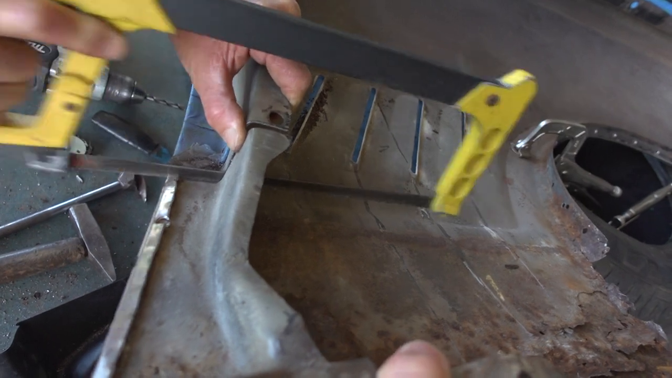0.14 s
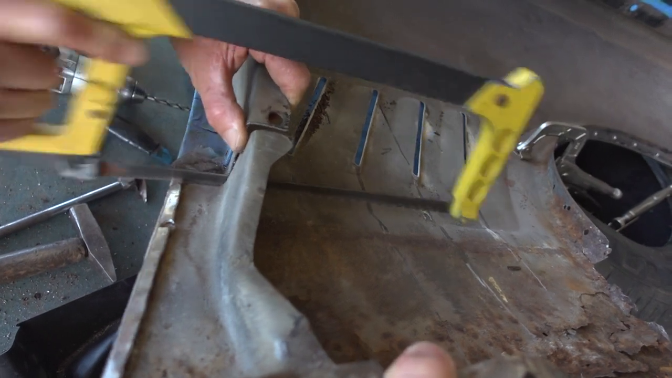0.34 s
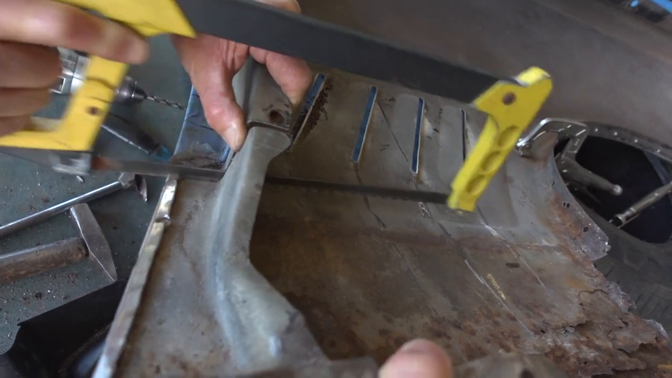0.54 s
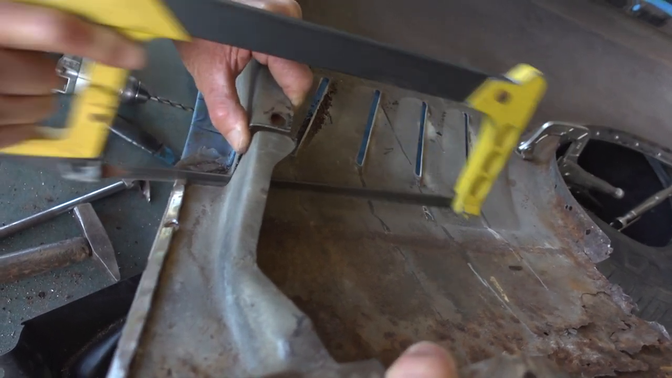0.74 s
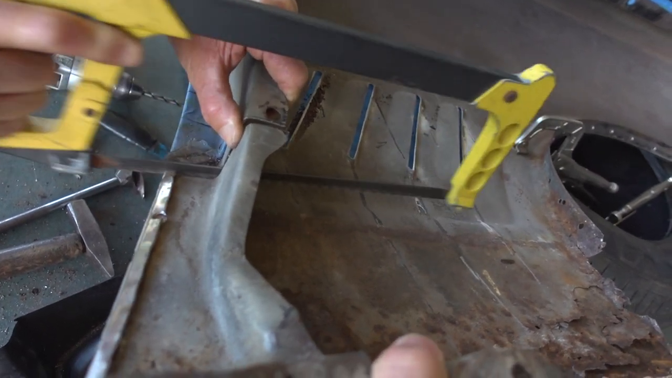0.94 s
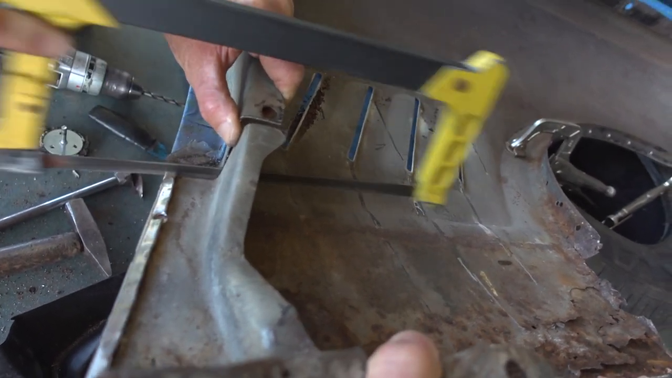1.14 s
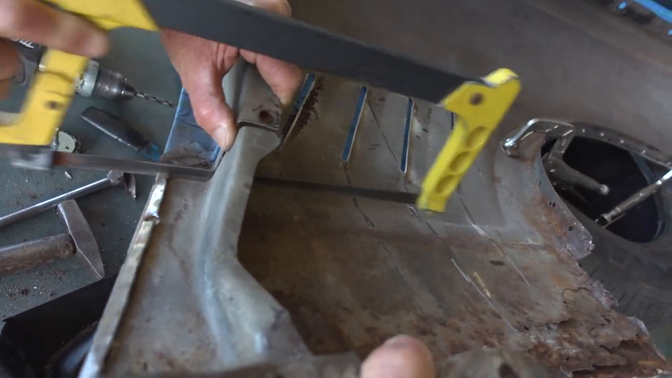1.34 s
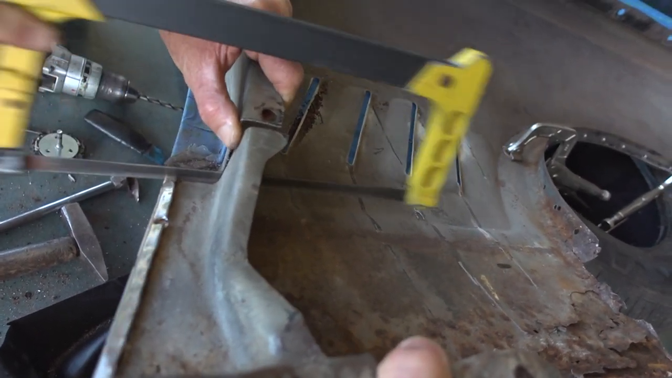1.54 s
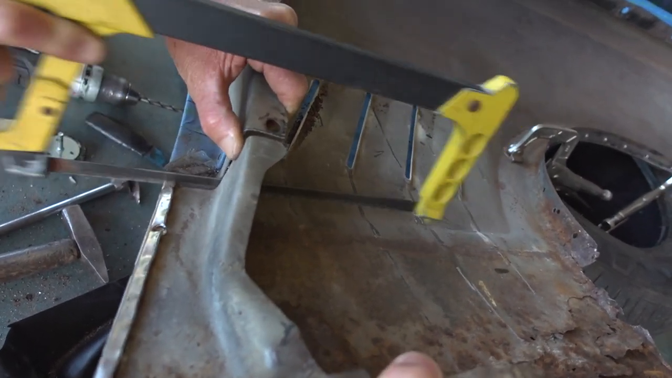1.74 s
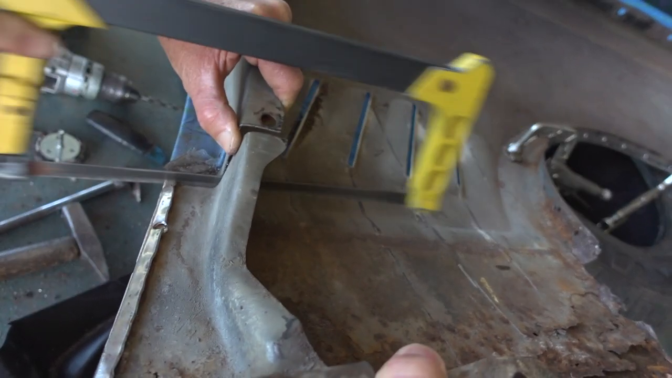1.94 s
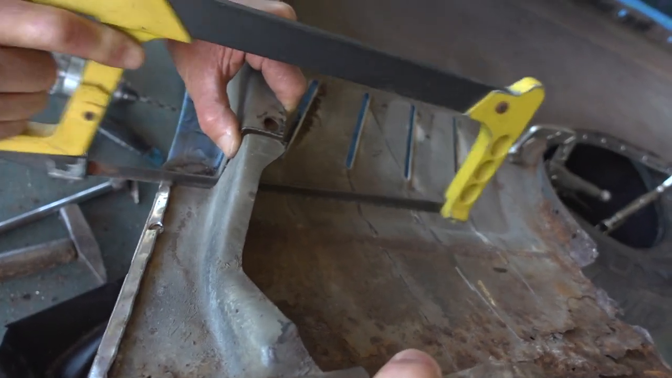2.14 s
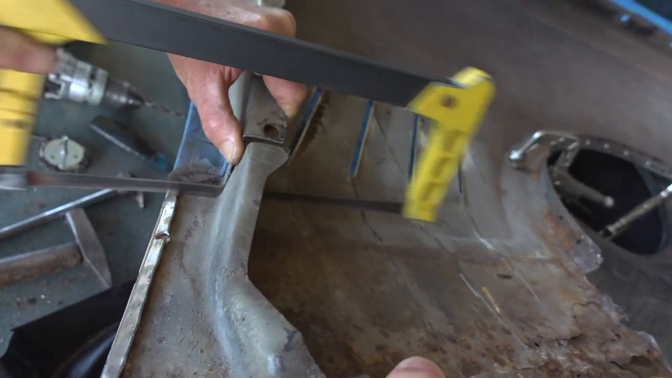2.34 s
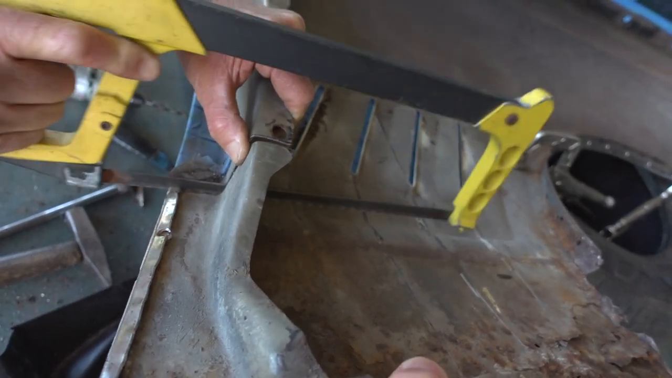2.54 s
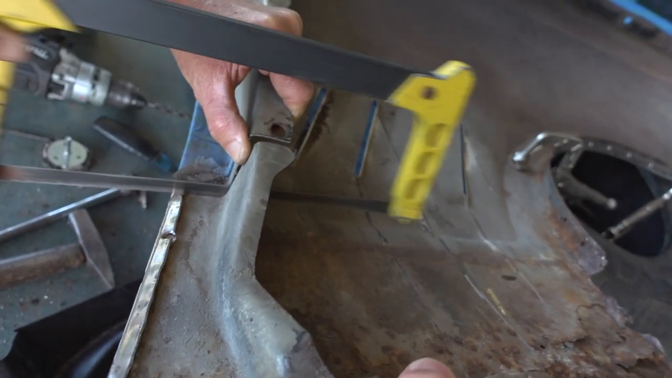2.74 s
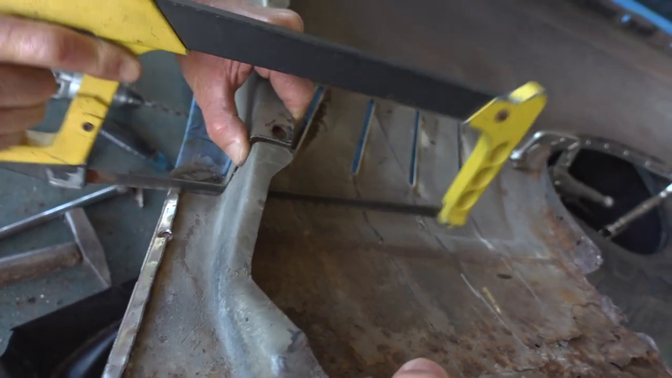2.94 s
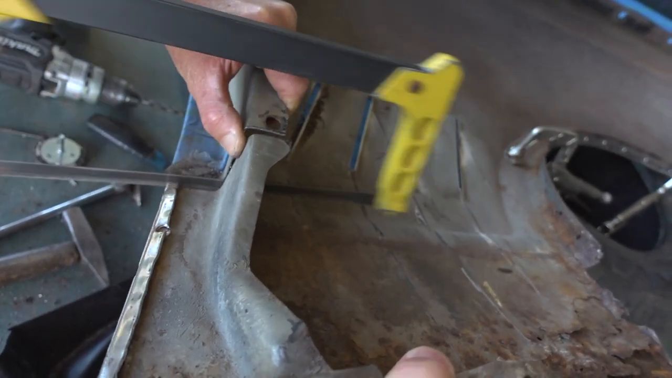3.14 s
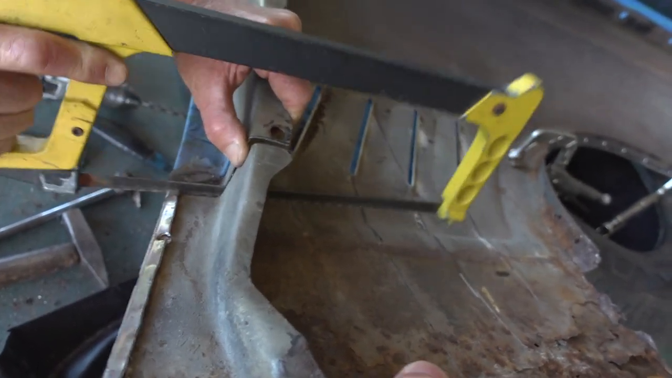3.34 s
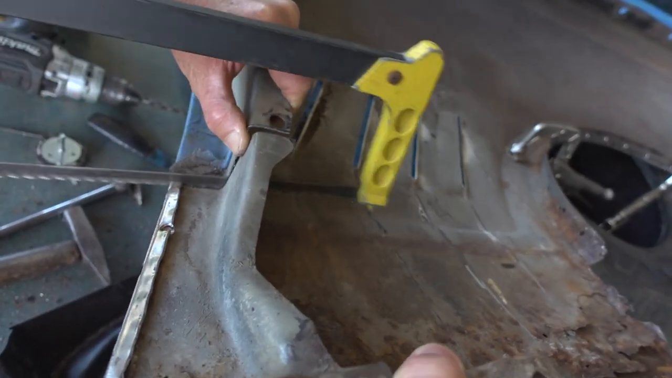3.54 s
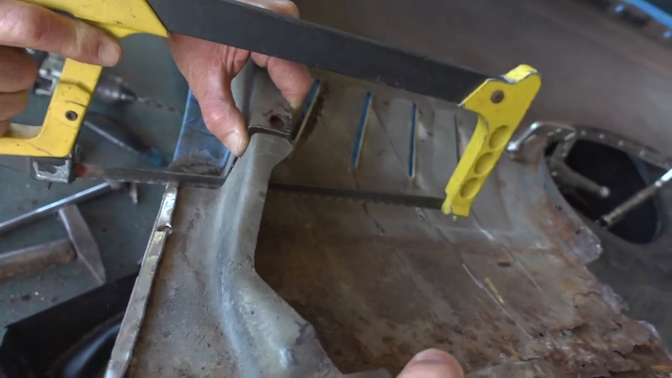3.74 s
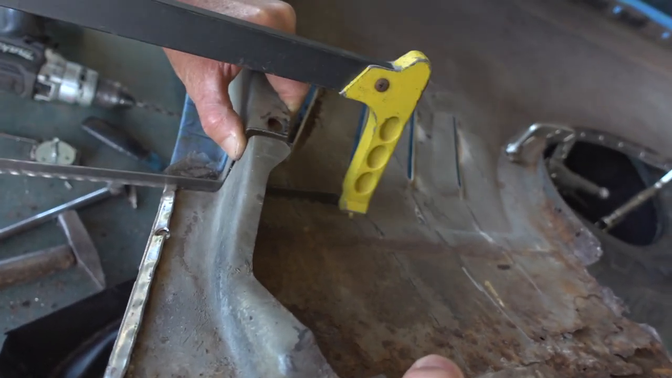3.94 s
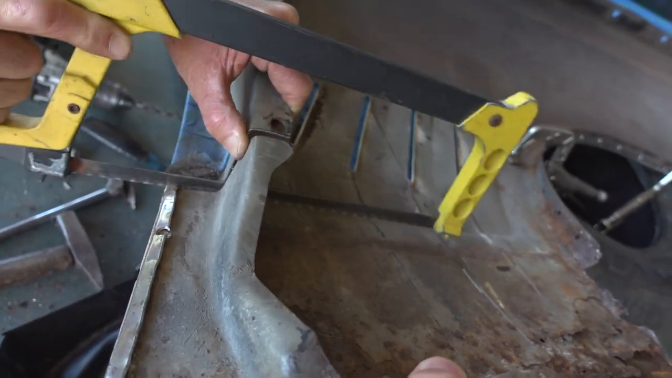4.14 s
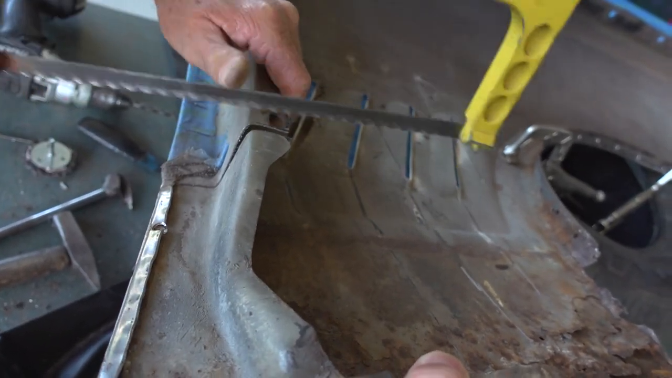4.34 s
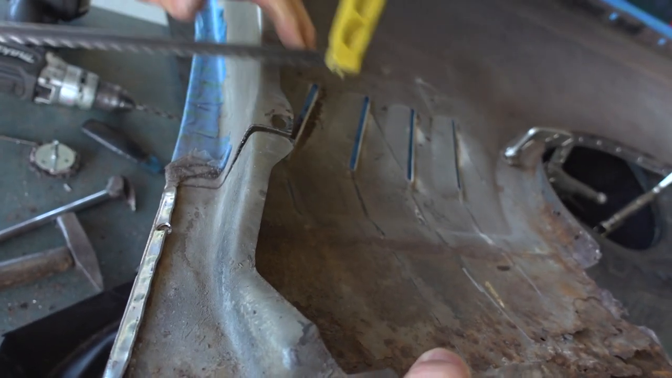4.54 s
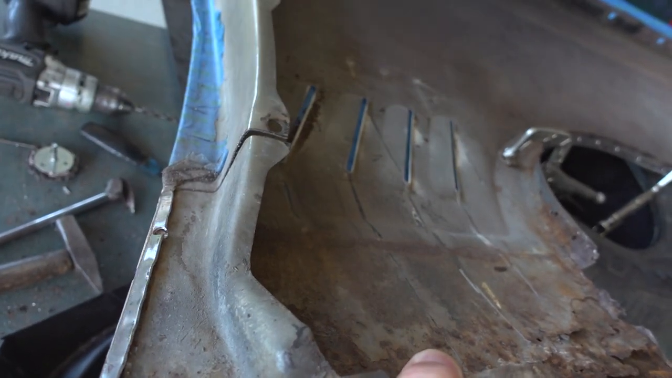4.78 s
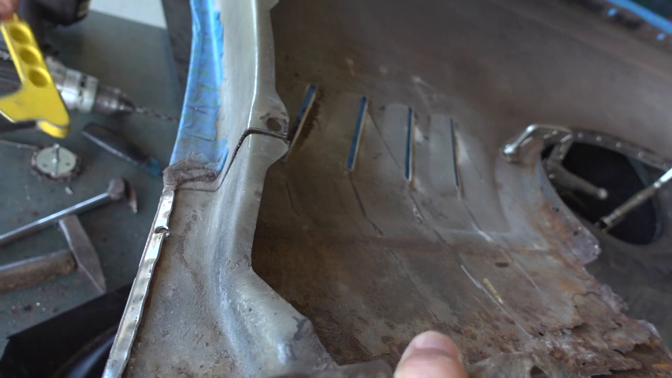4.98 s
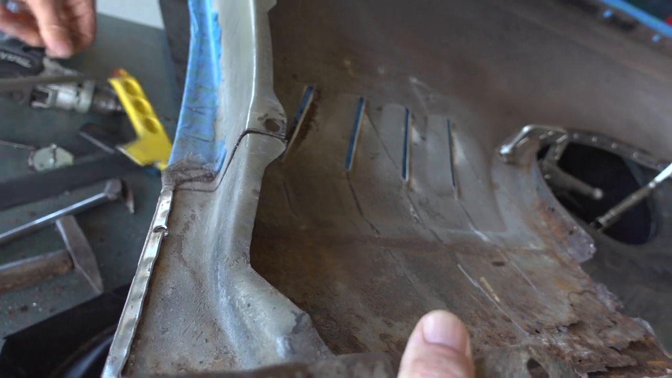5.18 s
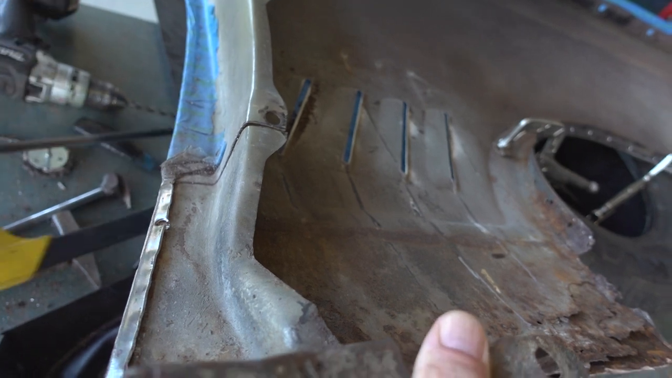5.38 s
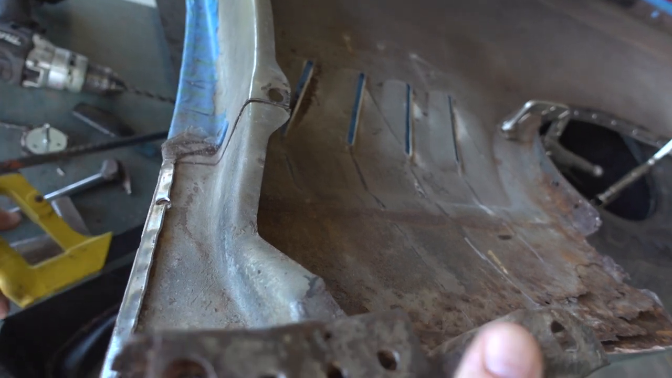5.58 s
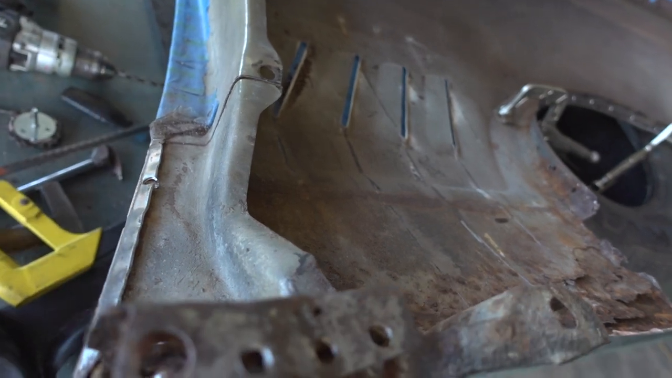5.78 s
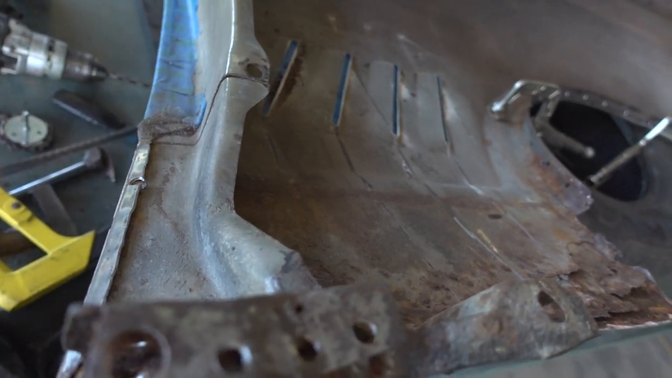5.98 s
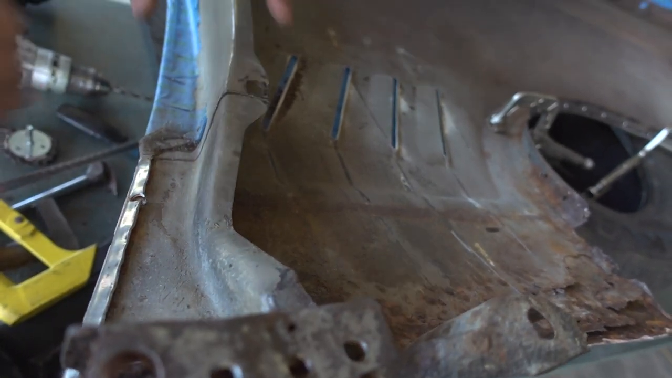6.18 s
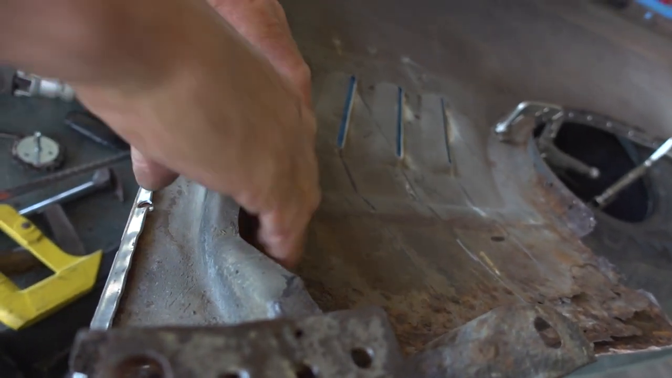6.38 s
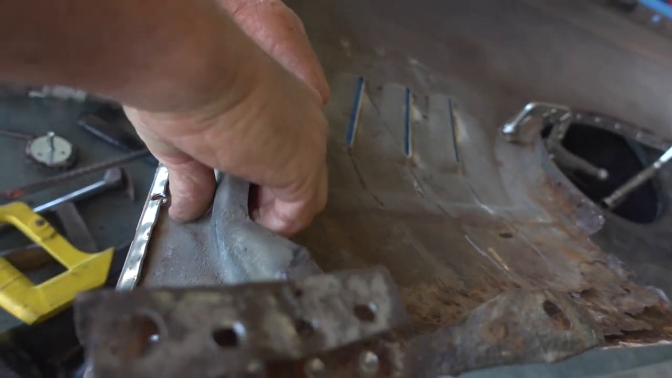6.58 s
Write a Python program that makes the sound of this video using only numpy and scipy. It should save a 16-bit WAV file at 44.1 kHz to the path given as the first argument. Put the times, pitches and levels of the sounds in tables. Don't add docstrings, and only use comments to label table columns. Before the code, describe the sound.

In a small workshop, a hand hacksaw cuts sheet steel in quick push-pull strokes, gritty and bright, with panel drone and whistling blade. Sharp slaps interrupt near the end, then the blade springs free with a ring. After a quiet second of faint rubbing and ticks, the saw clatters among metal tools, and hands brush the steel. Close stereo microphone, thin bass, loud passages levelled.

```python
import sys
import numpy as np
from scipy import signal
from scipy.fft import rfft, irfft
from scipy.io import wavfile

SR = 44100
rng = np.random.default_rng(int(sys.argv[2]) if len(sys.argv) > 2 else 0)


def boost(x):
    u = np.asarray(x, float) / 20
    return 10 ** u


def generate_wav(signal):
    frames = np.transpose(np.atleast_2d(signal))
    scaled = np.clip(frames, -1, 1) * 32767
    pcm = np.round(scaled).astype(np.int16)
    wavfile.write(sys.argv[1], SR, pcm)


N = 291942
STEP = 1024

# turn/s, swell/s, bite/s, rasp/dB, panel drone/dB
STROKES = [(0.0, 0.0016, 0.023, -21.5, -25.5), (.136, 0.05, 0.091, -19, -26), (.31, 0.019, 0.095, -20, -25),
           (.519, 0.083, 0.081, -19.5, -26.5), (0.716, .019, 0.091, -20.5, -24.5),
           (.928, 0.085, 0.082, -19.5, -27), (1.135, 0.014, 0.085, -20.5, -31),
           (1.32, 0.077, 0.088, -19.5, -27), (1.524, 0.022, 0.09, -20, -25.5),
           (1.739, 0.037, .12, -20, -24.5), (1.92, 0.018, 0.12, -20, -28.5),
           (2.151, 0.051, 0.1, -20.5, -26), (2.34, 0.015, 0.099, -19.5, -27),
           (2.547, 0.081, 0.093, -21, -27.5), (2.759, .02, .084, -19.5, -27),
           (2.957, 0.071, 0.097, -21.5, -26), (3.156, 0.02, 0.089, -20, -27),
           (3.417, .032, 0.093, -21, -26), (3.578, 0.025, 0.099, -21.5, -24.5),
           (3.838, .027, 0.11, -21.5, -23), (4.0, .023, 0.095, -20.5, -24), (4.212, .06, 0.05, -27, -35.5)]
# t/s, peak/dB, panel minus peak/dB, ring/dB, favoured f/Hz
KNOCKS = [(0.5308, -35.5, -10, -3, 1010), (0.9539, -58, -6, -9, 507), (2.1697, -30, 1.5, -7, 783.4),
          (3.279, -18, 7.5, -8, 1403), (3.337, -29, 19.5, -2, 2250), (3.8074, -46, -1, -8, 819),
          (3.8659, -20.5, -18, -7, 2261), (4.2222, -35.5, -15, -15.5, 1300), (4.2692, -31, -2, -7.5, 4326),
          (4.349, -16.5, -36.5, -11, 7040), (4.3581, -19, -4, 10, 2720)]
# t/s, peak/dB, thud minus peak/dB, ring/dB, favoured f/Hz
LANDINGS = [(5.4826, -15, -37, -4, 2600), (5.492, -20, -30, 3, 2200), (5.508, -20, -25, 4, 2140),
            (5.522, -19, -25, 4, 2140), (5.5394, -18, -25, 1, 2140), (5.59, -19, -15, 2, 2140),
            (5.607, -21, -8, 3, 1500), (5.5701, -19, -18, -1, 3120), (5.68, -13, -30, 1, 3200),
            (5.6888, -19, -20, 10, 3000), (5.699, -21, -20, 11, 3100), (5.709, -22, 5, 13, 900),
            (5.74, -23, -8, 10, 1780), (5.762, -19, -8, 7, 1600), (5.7811, -17, -8, 3, 3000),
            (5.795, -19, -6, 4, 1400), (5.8274, -20, -5, -2, 1780), (5.855, -22, 2, 2, 900),
            (5.8986, -13, -30, 3, 2500), (5.9333, -14, -25, -3, 4100), (6.0492, -21, -25, 6, 3300),
            (6.058, -24, -25, 6, 2600), (6.085, -28, -10, 3, 2400), (6.068, -29, 3, 9, 900),
            (6.118, -27, -8, 3, 2500)]


def rms_one(x):
    return x / np.sqrt(np.mean(x ** 2) + 1e-20)


def at_hz(points, hz):
    return np.interp(np.log(hz), np.log(np.array(points)[:, 0]), np.array(points)[:, 1])


def high_pass(x, order, hz):
    return signal.sosfilt(signal.butter(order, hz, "high", fs=SR, output="sos"), x)


def resonate(drive, hz, t60):
    r, w = boost(-60 / (t60 * SR)), 2 * np.pi * hz / SR
    return signal.lfilter([0, np.sin(w)], [1, -2 * r * np.cos(w), r * r], drive)


def drift(rate):
    r = np.exp(-80 * np.pi * rate / SR)
    slow = signal.lfilter([1], [1, -2 * r, r * r], rng.standard_normal(N // 40 + 2002))[2000:]
    return np.interp(np.arange(N) / 40, np.arange(len(slow)), rms_one(slow))


def grains(per_s, spread_db):
    sizes = boost(spread_db * np.minimum(rng.exponential(1, N), 5)) * rng.choice([-1, 1], N)
    return rms_one(sizes * (rng.random(N) < per_s / SR))


def gains(rows, rise_s, late_s, fall_db_per_s, dull_db_per_s):
    out = np.zeros((3, N))
    for s, hold, level_db, low_db, high_db in rows:
        at = round(s * SR)
        t = np.arange(min(N - at, SR // 2)) / SR
        main = boost(level_db - fall_db_per_s * np.maximum(t - hold, 0)) * np.minimum(t / rise_s, 1)
        low = boost(low_db) * np.minimum(t / late_s, 1)
        high = boost(high_db - dull_db_per_s * t)
        parts = main * [boost(0 * t), low, high]
        out[:, at:at + len(t)] = np.maximum(out[:, at:at + len(t)], parts)
    return out


def blows(events, crack_db, length_s):
    out = np.zeros((3, N))
    burst = np.exp(-np.arange(400) / (length_s * SR))
    shapes = rng.standard_normal((len(events), 400)) * burst / np.sqrt(np.sum(burst ** 2))
    for (s, peak_db, low_db, ring_db, near_hz), shape in zip(events, shapes):
        at = round(s * SR)
        blow = boost(peak_db + crack_db + np.c_[[0, low_db, 0]]) * shape
        out[:, at:at + 400] += blow[:, :N - at]
    return out


def body(spectrum, low_hz, high_hz, t60_at_1k, slope, direct, place, count):
    # f/Hz, side minus mid/dB
    side_by_hz = [(60, -37), (180, -45), (550, -25.5), (1650, -21), (4970, -18.5), (15000, -10.5)]
    # f/Hz, share of a source's left lean [1]
    lean_by_hz = [(400, 0.1), (1200, .4), (4000, 0.9), (12000, 0.9)]
    edges_hz = 70 * 2 ** np.arange(0, 8.1, 1 / 3)
    t, out, (lean_db, wide_db) = np.arange(8 * STEP) / SR, 0, place
    white = rng.standard_normal((2, count, 2, len(t)))
    path = 9 * rng.permutation(count)
    for k, (low, high) in enumerate(zip(edges_hz, edges_hz[1:])):
        hz = np.sqrt(low * high)
        if low_hz < hz < high_hz:
            fade = boost(-60 * t / (t60_at_1k * (hz / 1000) ** -slope))
            dying = white[k % 2] * fade
            click = (-1) ** k * direct * np.sqrt(np.sum(fade ** 2))
            dying[np.arange(count), 0, path] = click
            band = signal.sosfilt(signal.butter(2, [low, high], "band", fs=SR, output="sos"), dying)
            energy = np.mean(np.sum(band[:, 0] ** 2, axis=1))
            level = boost(at_hz(spectrum, hz)) * np.sqrt((high - low) / energy)
            side = boost(at_hz(side_by_hz, hz) + wide_db) * band[:, 1:] * [[1], [-1]]
            lean = boost(lean_db / 2 * at_hz(lean_by_hz, hz) * np.c_[[1, -1]])
            out = out + level * (band[:, :1] + side) * lean
    return out / np.sqrt(np.sum(out ** 2, axis=(1, 2), keepdims=True) / 2)


def contact(forces, spectrum, edges_hz, t60_at_1k, slope, direct, place, count):
    parts = [(edges_hz[0], edges_hz[1]), (0, edges_hz[0]), (edges_hz[1], SR)]
    responses = [body(spectrum, *p, t60_at_1k, slope, direct, place, count) for p in parts]
    bodies = np.array([rfft(response, 10 * STEP) for response in responses])
    out = np.zeros((2, N + 12 * STEP))
    fade = np.sin(np.pi * np.arange(2 * STEP) / (2 * STEP))
    padded = np.pad(forces, ((0, 0), (STEP, 2 * STEP)))
    order = rng.random(N // STEP + 2)
    for k, at in enumerate(range(0, N + STEP, STEP)):
        piece = padded[:, at:at + 2 * STEP] * fade
        if piece.any():
            place_now = (2 * int(order[k] * count / 2) + k % 2) % count
            heard = rfft(piece, 10 * STEP)[:, None] * bodies[:, place_now]
            out[:, at:at + 10 * STEP] += irfft(np.sum(heard, axis=0))
    return out[:, STEP:STEP + N]


def modes(force, events, table, moves):
    out, (s, peak_db, low_db, ring_db, near_hz) = 0, np.transpose(events)
    luck = rng.standard_normal((len(events), len(table)))
    for k, (hz, level_db, t60) in enumerate(table):
        drive = force * boost(level_db + 1.6 * drift(moves)) + 1e-18
        off_db = 8 * abs(np.log2(hz / near_hz))
        hit_db = peak_db + ring_db + level_db - off_db + 2 * luck[:, k]
        drive[np.round(s * SR).astype(int)] += boost(hit_db)
        out = out + (-1) ** k * resonate(drive, hz, t60)
    return out


def saw():
    # f/Hz, level per Hz/dB
    cut = [(47, -62), (80, -63), (99, -25), (125, -28.5), (166, -14), (283, -12), (386, -7.5), (431, -3.5),
           (1430, -6.5), (2270, -8.5), (4730, -5.5), (5520, -13), (8410, -3.5), (14000, -17.5),
           (16000, -11)]
    # f/Hz, level per Hz/dB
    snap = [(100, -70), (300, -24), (600, -3), (1400, -3), (2000, -7), (4000, -5), (8000, -6), (16000, -24)]
    parts_hz = (1800, 6500)
    push = strokes()
    force = teeth(np.minimum(push[0] / boost(-21), 1.2))
    rasp = contact(boost(1.41) * push * force, cut, parts_hz,
                   t60_at_1k=0.16, slope=0.7, direct=0.82, place=(.9, 3), count=6)
    knocks = blows(KNOCKS, crack_db=27, length_s=0.00074)
    panel = contact(knocks, snap, parts_hz,
                    t60_at_1k=0.33, slope=0.56, direct=0.41, place=(.9, 1), count=2)
    ring = blade(push[0] * force) + flap(push[1] * force) + singing(push[0])
    ring = high_pass(ring, 2, 200)
    return rasp + panel + ring * boost([[.5], [-.5]])


def strokes():
    # t/s, half length/s, change of pressure/dB
    pressure = [(0.097, .04, -4.5), (0.559, 0.032, -4), (0.973, .03, -4), (1.718, 0.039, -4),
                (3.285, .03, -8.5), (3.379, .08, 5), (3.802, .07, -9), (4.165, 0.029, 4.5),
                (4.283, 0.01, 4.5), (4.292, 0.0065, -2.5), (4.317, 0.021, 4), (4.338, .014, -14)]
    free_s = 4.345
    turn, swell, bite, bite_db, drone_db = np.transpose(STROKES)

    def pull_push(pull, push):
        return np.resize((pull, push), len(turn))

    turn_db, ease = pull_push(-30, -41), pull_push(.035, .016)
    dip_db, sag_db = pull_push(-5, -6.5), pull_push(-3.5, -1)
    growth_db = pull_push(5.5, -1)
    times = np.minimum(np.cumsum([turn, swell, bite, ease], axis=0), np.append(turn[1:], free_s)).T
    eased_db = np.maximum(bite_db - 13.5, np.roll(turn_db, -1))
    t = np.arange(N) / SR
    rasp_db = np.interp(t, times.ravel(), np.c_[turn_db, bite_db, bite_db, eased_db].ravel())
    panel_db = np.c_[dip_db, -growth_db / 2, growth_db / 2, sag_db] + drone_db[:, None]
    panel_db = np.interp(t, times.ravel(), panel_db.ravel()) + 1.6 * drift(9.4)
    sizzle_db = rasp_db - 3.0 + 0.19 * (rasp_db + 21.5) + 0.67 * drift(2.8)
    lean_db = sum(np.interp(t, [s - half, s, s + half], [0, db, 0]) for s, half, db in pressure)
    return boost(np.array([rasp_db, panel_db, sizzle_db]) + lean_db) * (t < free_s)


def teeth(speed):
    phase = np.cumsum(1300 * speed ** .4 * boost(1.5 * drift(60))) / SR
    bite = np.diff(np.floor(phase), prepend=0) * boost(2.75 * rng.standard_normal(N))
    chips = grains(16000, 1.56)
    return rms_one(0.82 * rms_one(bite - bite.mean()) + chips) * boost(0.8 * drift(27))


def blade(force):
    # f/Hz, level/dB, t60/s
    blade_modes = [(512, -10, .08), (620, -11, .08), (1410, -16, .08), (1470, -13, .12), (2080, -12, .08),
                   (2660, -8, .15), (3295, -8, .12), (4000, -10, .15), (4380, -7, .1), (4500, -7, .1),
                   (4755, -8, .12), (4890, -13, .24), (5200, -9, .08), (6860, -11, .12), (7465, -10, .1),
                   (8460, -9, .07), (9030, -11, .07), (9485, -13, .15), (10670, -15, .1), (14000, -17, .04)]
    # f/Hz, level/dB, t60/s
    snag_modes = [(930, -4, .08), (2720, -12, .07), (2900, -6, .06), (4250, -5, .03), (4800, -7, .22),
                  (5500, -6, .025), (6900, -4, .03), (8300, -4, .02), (9500, -7, .08), (10700, -6, .04),
                  (11500, -6, .035), (13600, -9, .02)]
    # t/s, peak/dB, low/dB, ring/dB, favoured f/Hz
    snags = [
        (4.2745, -19, 0, 0, 4250),
        (4.2811, -19, 0, 0, 6900),
        (4.316, -17, 0, 0, 4800),
        (4.325, -17, 0, 0, 11000),
        (4.358, -12, 0, 0, 3300),
        (4.3585, -17, 0, 0, 10500),
    ]
    # f/Hz, level/dB, t60/s
    crack = [(1400, 0, .03), (1900, 0, .025), (2500, 0, .022), (3200, 0, .02), (4000, 0, .018),
             (5000, 0, .016), (6300, 0, .016), (7700, 0, .016), (9500, -3, .012), (12000, -6, .01)]
    # t/s, peak/dB, low/dB, ring/dB, favoured f/Hz
    slaps = [
        (3.2782, -16, 0, 0, 1400),
        (3.3372, -13, 0, 0, 1900),
        (3.3395, -16, 0, 0, 3000),
        (4.3492, -13, 0, 0, 5500),
        (4.351, -15, 0, 0, 7000),
        (4.3577, -16, 0, 0, 3500),
        (4.36, -17, 0, 0, 7000),
    ]
    # f/Hz, level/dB, t60/s
    spring = [(665, 18, .4), (1771, -7, .4), (2690, -1, .32), (4000, -12, .35), (4441, -22, .4),
              (4797, 1, .17), (4899, -14, .25), (6858, -15, .23), (8328, -11, .16), (9485, -9, .26)]
    # t/s, peak/dB, low/dB, ring/dB, favoured f/Hz
    sprung = [
        (4.35841, -21, 0, 0, 4797),
    ]
    silent = np.zeros(N)
    ring = modes(boost(-36.5) * force, KNOCKS, blade_modes, moves=9)
    snagging = np.arange(N) > 4.268 * SR
    ring += modes(boost(-22.5) * force * snagging, snags, snag_modes, moves=30)
    ring += modes(silent, slaps, crack, moves=9)
    return ring + modes(silent, sprung, spring, moves=9)


def flap(force):
    # f/Hz, level/dB, t60/s
    flap_modes = [(240, -13, .1), (530, 0, .09), (610, -8, .06), (770, -3, .05), (1150, -1, .07),
                  (1320, -4, .06), (1420, 0, .09)]
    # t/s, peak/dB, low/dB, ring/dB, favoured f/Hz
    jolts = [(3.279, -12, 0, -4, 1300), (3.288, -16, 0, -1, 1400), (3.301, -17, 0, 1, 1150),
             (3.308, -19, 0, -2, 1450), (3.32, -20, 0, -3, 770), (3.343, -12, 0, 2, 530),
             (3.3505, -14, 0, 0, 530), (3.809, -30, 0, 0, 1000), (3.93, -20.5, 0, 6.5, 1200),
             (3.972, -17, 0, 3.5, 1297), (4.366, -26, 0, 0, 663)]
    groaning = np.arange(N) > 3.92 * SR
    return modes(boost(-28.5) * force * groaning, jolts, flap_modes, moves=20)


def singing(push):
    # f/Hz, t60/s, growth along a bite/dB, phase wander/rad, lift/dB
    singers = [
        (2630, .04, -8, 5, 6),
        (4795, .2, 3, .6, 6),
        (4890, .15, 3, 1.1, 2.5),
    ]
    # level of each mode in turn/dB, /dB, /dB
    levels = [(-45, -49, -45), (-26, -32, -37), (-43, -39, -33), (-37, -33, -28), (-45, -46, -29),
              (-31, -29, -41), (-35, -32.5, -33), (-34, -29, -39), (-43, -40, -43), (-40, -30, -47),
              (-42, -61, -27), (-32, -37, -42), (-44, -49, -31), (-30.5, -32, -45.5), (-41.5, -41.5, -32.5),
              (-30.5, -30, -39), (-40, -37.5, -38), (-40, -28.5, -41), (-43, -45, -34), (-30.5, -44.5, -43),
              (-27, -48, -42.5), (-44, -39, -49.5)]
    turn, swell, bite, bite_db, drone_db = np.transpose(STROKES)
    times = np.c_[turn + swell, turn + swell + bite].ravel()
    t, out = np.arange(N) / SR, 0
    for (hz, t60, growth_db, wander, lift_db), level_db in zip(singers, np.transpose(levels) - bite_db):
        r, w = boost(-60 / (t60 * SR)), 2 * np.pi * hz / SR
        bite_levels = np.c_[level_db - growth_db / 2, level_db + growth_db / 2].ravel()
        gain = boost(np.interp(t, times, bite_levels) + lift_db)
        chatter = np.sin(w * np.arange(N) + wander * drift(11.2))
        out = out + resonate(2 * (1 - r) * push * gain * chatter, hz, t60)
    return out


def dropped_saw():
    # t/s, hold/s, rattle/dB, thud minus rattle/dB, sizzle minus rattle/dB
    rattle = [
        (5.483, 0.13, -14.5, -6, -7.5),
        (5.681, 0.03, -18.5, -25, 1),
        (5.709, 0.098, -15.5, -2, -8),
        (5.83, 0.034, -23, 8.5, -17),
        (5.9, 0.026, -23, -9, -0.5),
        (6.05, 0.03, -22, -8.5, -15),
    ]
    # f/Hz, level per Hz/dB
    bench = [(47, -49), (80, -29), (338, -10.5), (493, -10.5), (958, -5), (1170, -20), (1280, 9.5),
             (1780, 4), (1950, 2), (2600, 5), (4420, -6.5), (7050, -13), (16000, -30)]
    # f/Hz, level/dB, t60/s
    frame_pair = [(1771, -7, 1.0), (1782, -1, 1.2)]
    # t/s, peak/dB, low/dB, ring/dB, favoured f/Hz
    frame_struck = [
        (5.74, -22, 0, 0, 1780),
    ]
    chattering = rms_one(grains(2500, 2.2) + 0.75 * grains(150, 0.43))
    force = chattering * gains(rattle, rise_s=0.003, late_s=0.12, fall_db_per_s=191, dull_db_per_s=48)
    force = boost(-3.0) * force + blows(LANDINGS, crack_db=18.5, length_s=0.00096)
    chatter = contact(force, bench, (1200, 4500),
                      t60_at_1k=0.16, slope=0.56, direct=0.37, place=(4, 4.5), count=4)
    ring = modes(boost(-68) * force[0], frame_struck, frame_pair, moves=9.6) + struck_tools(force[0])
    ring = high_pass(ring, 2, 600)
    return chatter + ring * boost([[1.1], [-1.1]])


def struck_tools(force):
    # f/Hz, width/Hz, level/dB
    first_tools = [(974, 92, -8), (1420, 23, -4), (1650, 50, -5), (1790, 22, -3), (2140, 170, 0),
                   (2500, 30, -5), (2800, 22, -8), (3120, 34, -6), (3670, 57, -7), (4770, 58, -13),
                   (5630, 43, -12), (5780, 25, -16), (6310, 55, -19), (6860, 120, -16)]
    second_tools = [(930, 90, -3), (1250, 21, -4), (1480, 30, -3), (1780, 30, -3), (2140, 29, -7),
                    (2680, 34, -3), (2810, 15, -8), (3020, 53, -8), (3670, 60, -14), (3920, 22, -13),
                    (4810, 44, -15), (5720, 31, -18), (6350, 27, -17), (6810, 28, -15)]
    third_tools = [(2140, 22, -7), (2470, 16, -3), (2580, 13, -3), (2910, 20, -4), (3230, 29, -8),
                   (3640, 29, -5), (4130, 110, -10), (4480, 28, -11), (4710, 25, -12), (5050, 40, -14),
                   (5710, 24, -12), (6080, 26, -10), (7310, 26, -11)]
    last_tools = [(856, 45, -8), (1480, 120, -5), (1780, 26, -1), (2140, 25, -8), (2380, 18, 1),
                  (2830, 28, 0), (3040, 24, -7), (3220, 58, -8), (3670, 11, 0), (4120, 17, 2),
                  (5070, 27, -13), (5480, 79, -15), (5740, 30, -14), (6120, 36, -15)]
    bounces = [
        (5.48, -35.5),
        (5.678, -22.5),
        (5.897, -18.5),
        (6.046, -27.5),
    ]
    out, t = 0, np.arange(N) / SR
    ends = [s for s, db in bounces[1:]] + [N / SR]
    tools = (first_tools, second_tools, third_tools, last_tools)
    for (s, drive_db), end, peaks in zip(bounces, ends, tools):
        table = [(hz, db + 20 * np.log10(width / 30) - 4, 3.2 / width) for hz, width, db in peaks]
        hits = [row for row in LANDINGS if s <= row[0] < end]
        out = out + modes(boost(drive_db) * force * (t >= s) * (t < end), hits, table, moves=12)
    return out


def hands():
    # t/s, hold/s, rub/dB, low minus rub/dB, high minus rub/dB
    rubbing = [(4.44, 0.029, -39.5, -1.5, -15), (4.6, 0.1, -55.5, -14.5, -20.5),
               (4.805, 0.013, -54, -24, -3), (4.925, 0.031, -66.5, -25, 14), (4.985, 0.0092, -69, -21, 17),
               (5.04, 0.018, -71, -22, 15), (5.17, 0.064, -58, -2, 4), (5.23, 0.082, -52.5, -10, -8.5),
               (5.33, 0.16, -54, -11, -4), (6.14, 0.022, -51, -13, -5), (6.2, 0.15, -54, -2.5, -9),
               (6.305, 0.039, -49, 0, -4), (6.41, 0.14, -48, -6.5, -3.5), (6.55, 0.032, -55, -10, 3)]
    # t/s, peak/dB, low minus peak/dB, ring/dB, favoured f/Hz
    ticking = [(4.8143, -41, -28, -8, 2900), (4.916, -38, -24, -23, 3630), (4.929, -45.5, -29, -1, 4010),
               (4.995, -41, -24, -8, 4000), (5.043, -36, -25, -25, 4077), (5.06, -40, -26, -19.5, 4860),
               (5.1402, -42.5, -17, -36, 1710), (5.177, -45, -20, -23, 3670), (5.289, -36, -23, -36, 2450),
               (6.315, -45, -2, -6, 1850), (6.4655, -35, -22, -13, 3800), (6.533, -32, -22, -27, 2950),
               (6.555, -21.5, -35, -17, 4270), (6.609, -28, -27, -32, 4270)]
    # f/Hz, level per Hz/dB
    skin = [(88, -63), (150, -28), (450, -20), (589, 3), (716, -11), (821, -8), (888, -3), (2100, 0.5),
            (5910, -2.5), (16000, -13)]
    # f/Hz, level/dB, t60/s
    frame = [(1760, -4, .2), (1781, 2, .3), (2668, -5, .15), (3630, -5, .15), (4077, -5, .15),
             (4797, -6, .2)]
    force = gains(rubbing, rise_s=0.0052, late_s=0.054, fall_db_per_s=236, dull_db_per_s=5)
    force = force * grains(9200, 5.0) * boost(0.8 * drift(28))
    ticks = blows(ticking, crack_db=14.0, length_s=0.00067)
    rub = contact(boost(1.0) * force + ticks, skin, (1200, 4500),
                  t60_at_1k=0.41, slope=1.0, direct=0.48, place=(6, 7), count=2)
    carried = np.interp(np.arange(N) / SR, (4.8, 5.48), [.5, 1], left=.1, right=.15)
    ring = modes(boost(-28) * carried * force[0], ticking, frame, moves=5)
    return rub + ring * boost([[2.2], [-2.2]])


def workshop(x):
    t60_s = 0.47
    t = np.arange(SR) / SR
    dull = signal.lfilter([1], [1, -.35], rng.standard_normal((2, SR)))
    mid, side = dull * boost(-60 * t / t60_s) * (t > .012)
    side = high_pass(side, 4, 500)
    tail = (mid + 0.49 * side * [[1], [-1]]) / np.sqrt(np.sum(mid ** 2))
    return signal.oaconvolve(x.mean(axis=0)[None], tail)[:, :N]


def air():
    # f/Hz, level per Hz/dB
    hush_spectrum = [(59, -70), (100, -32), (400, -16), (1250, -9.5), (1720, 5.5), (2750, -8), (4770, 2),
                     (5900, 4), (14400, -8), (16000, -25.5)]
    hush = boost(-57.5) * rng.standard_normal((3, N)) * boost([[-2], [-12], [-7]])
    return contact(hush, hush_spectrum, (1200, 4500),
                   t60_at_1k=0.18, slope=0.57, direct=0.37, place=(1.5, 12), count=2)


def scene():
    near = saw() + dropped_saw() + hands()
    return near + boost(-17.5) * workshop(near) + air()


def low_pass(x):
    return signal.sosfilt(signal.butter(12, 17040, fs=SR, output="sos"), x)


def record(dry):
    thin = high_pass(dry, 6, 125)
    hold = np.exp(-1 / (0.093 * SR))
    level = np.sqrt(signal.lfilter([1 - hold], [1, -hold], np.mean(thin ** 2, axis=0)))
    held = thin * np.maximum(level / boost(-11.5), 1) ** -.6
    rounded = 0.89 * np.tanh(held / 1.096)
    top_cut = signal.ellip(12, .5, 80, 15800, fs=SR, output="sos")
    return low_pass(signal.sosfilt(top_cut, rounded))


dry = scene()
out = record(dry)
generate_wav(out)
```